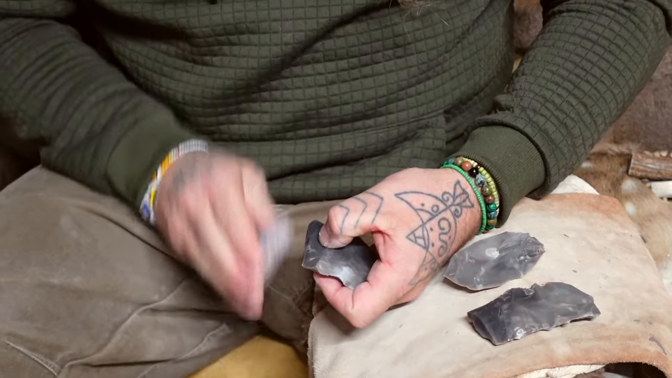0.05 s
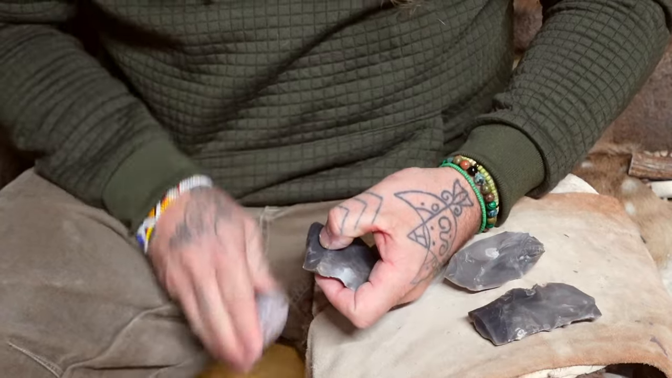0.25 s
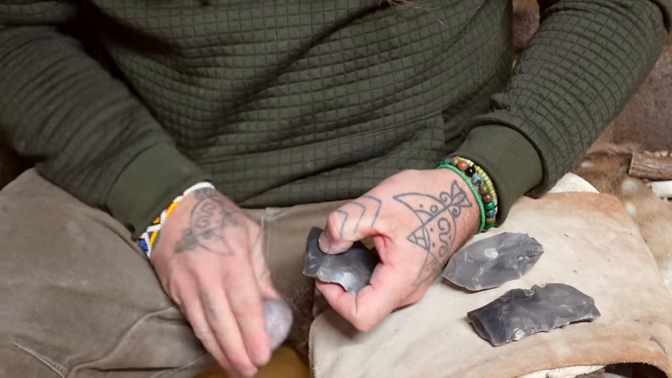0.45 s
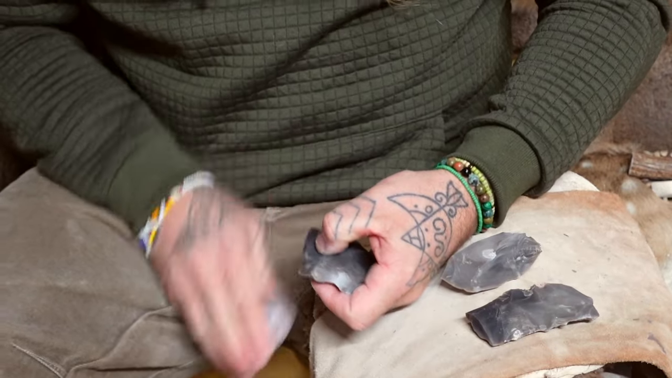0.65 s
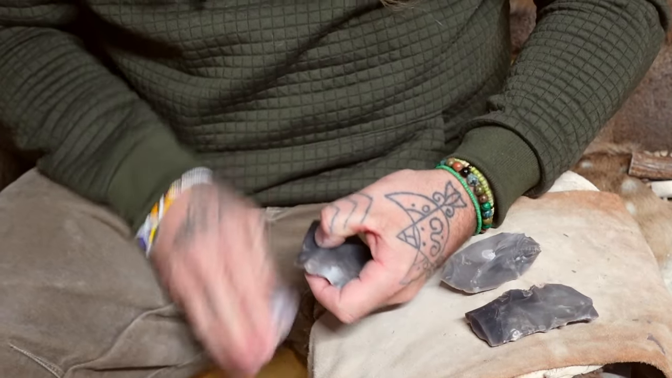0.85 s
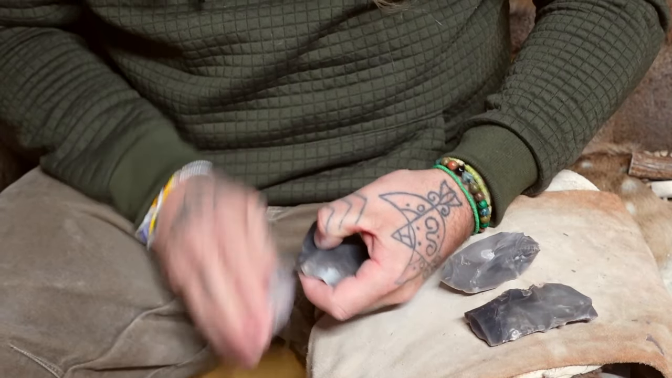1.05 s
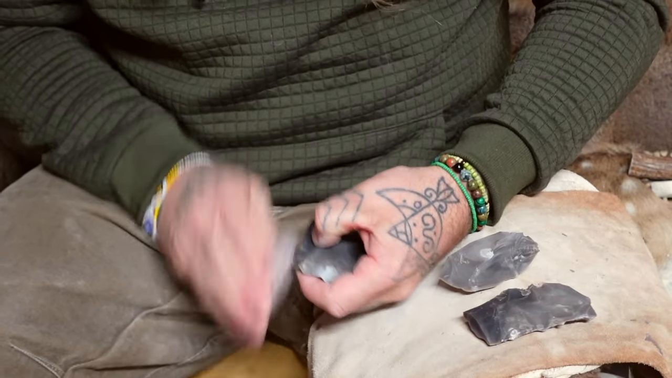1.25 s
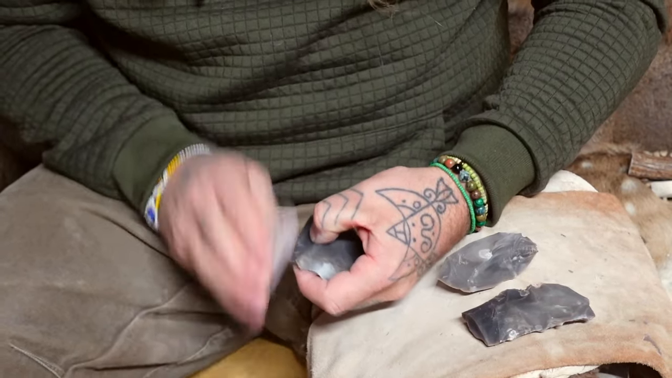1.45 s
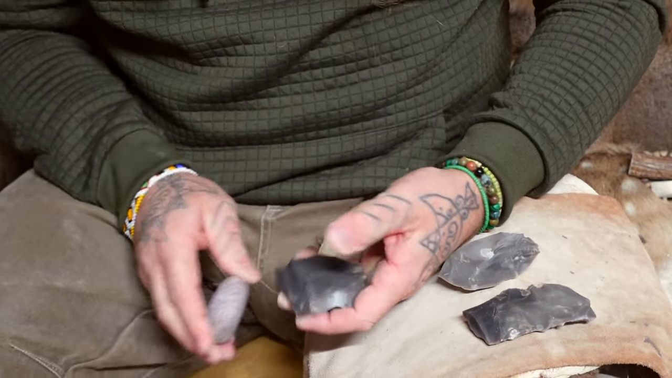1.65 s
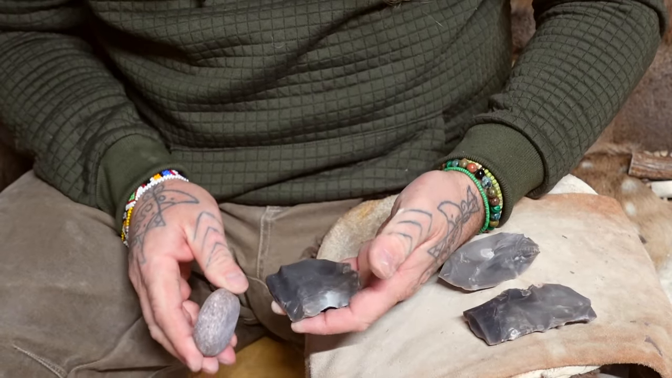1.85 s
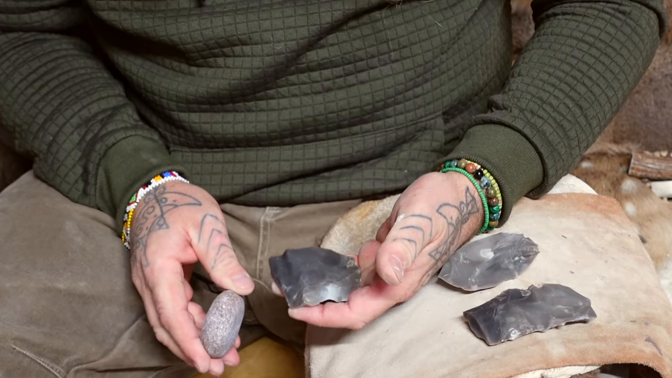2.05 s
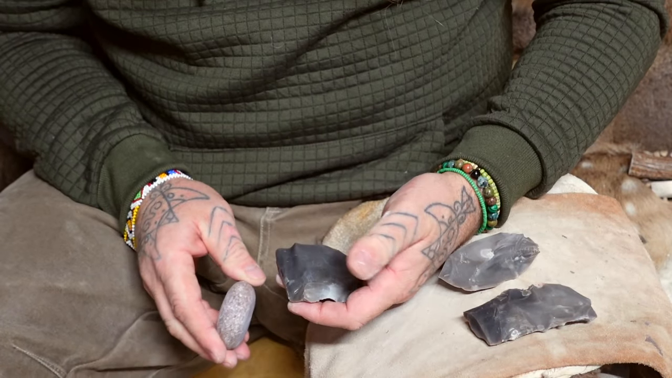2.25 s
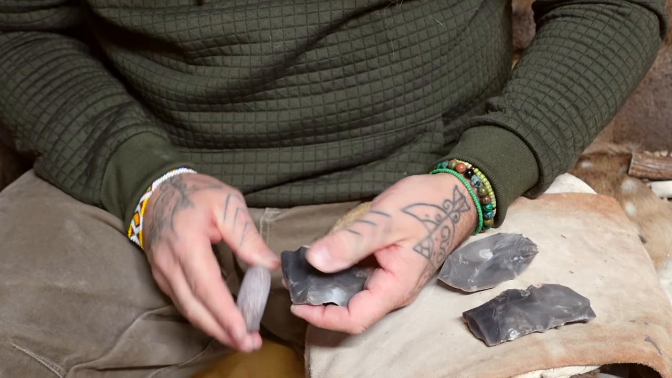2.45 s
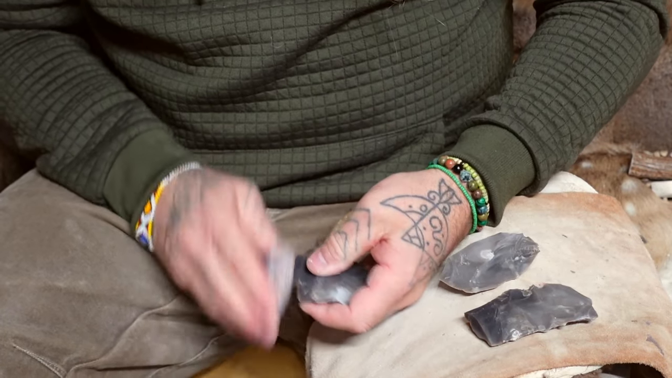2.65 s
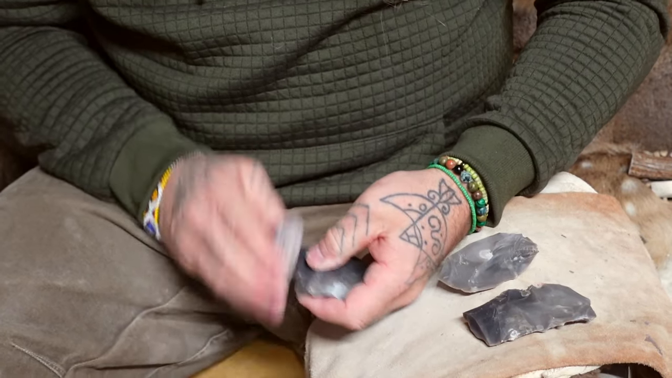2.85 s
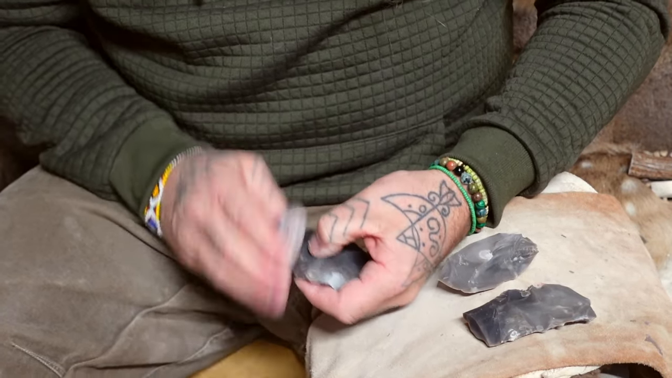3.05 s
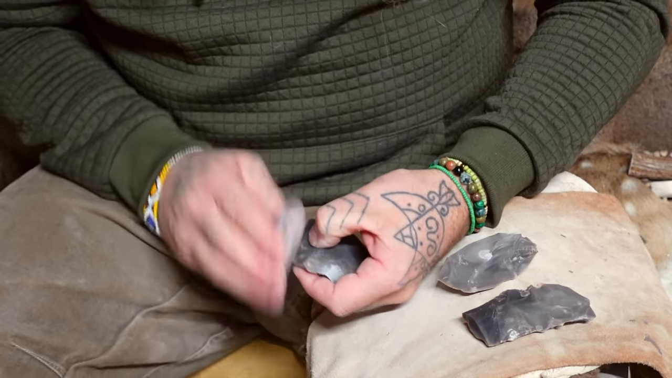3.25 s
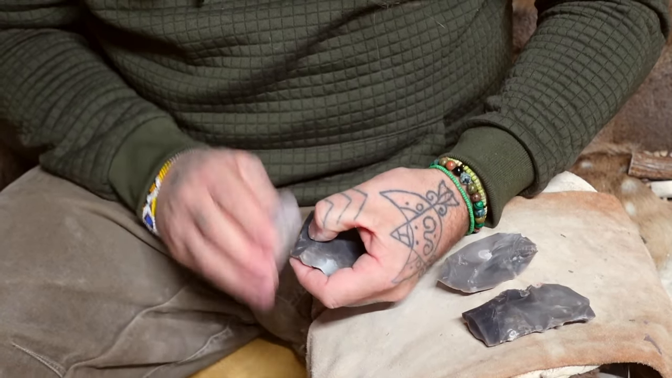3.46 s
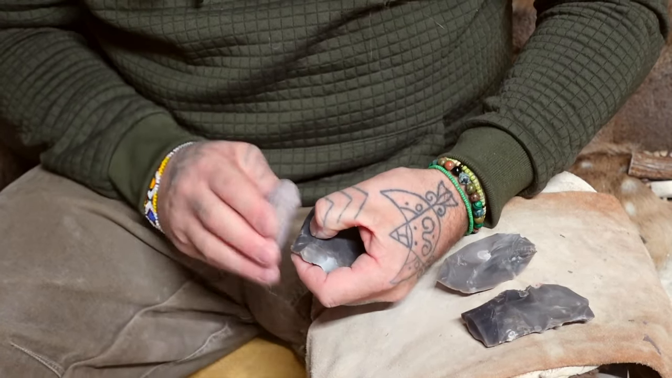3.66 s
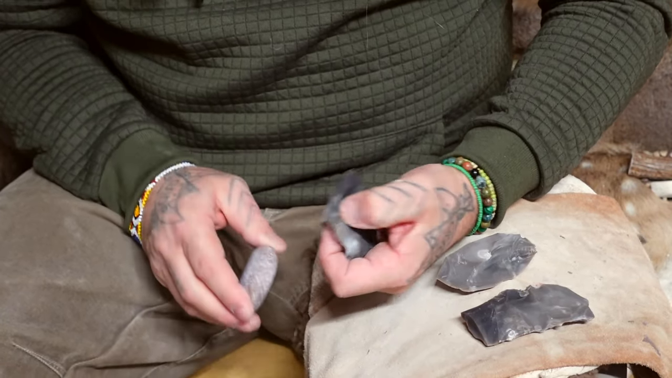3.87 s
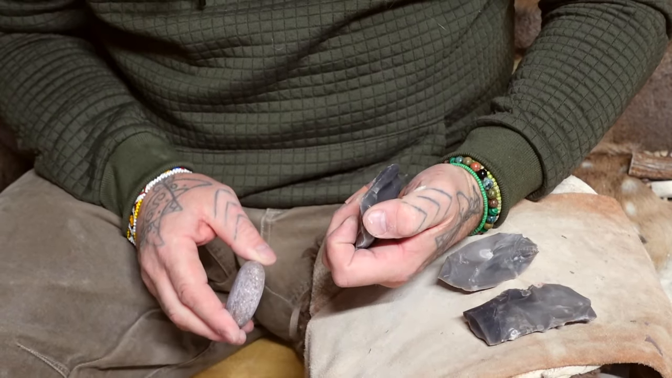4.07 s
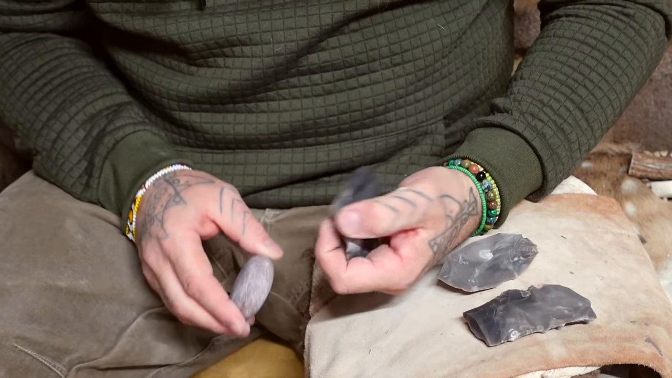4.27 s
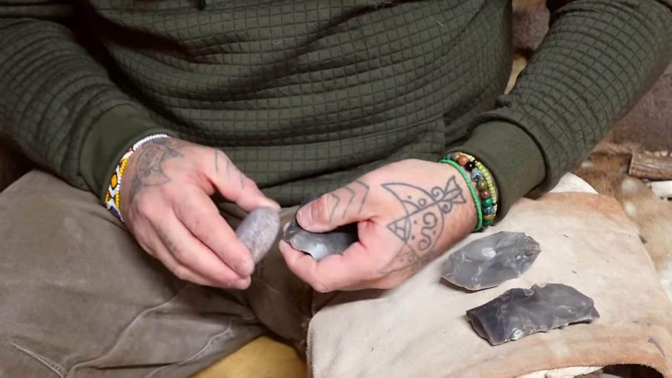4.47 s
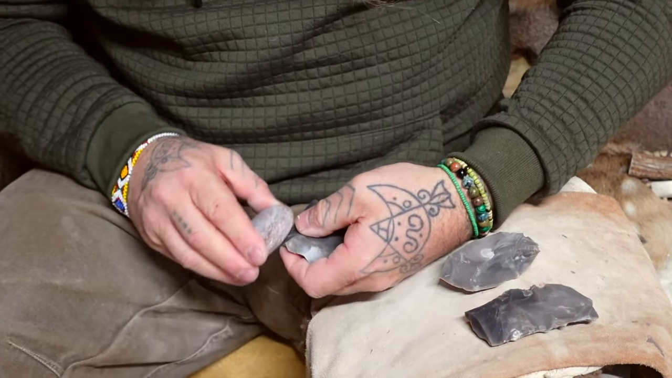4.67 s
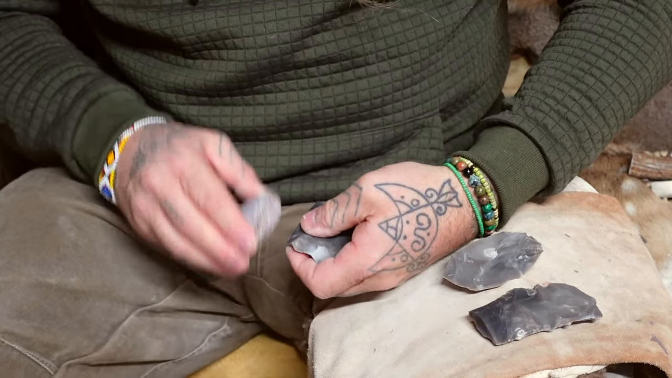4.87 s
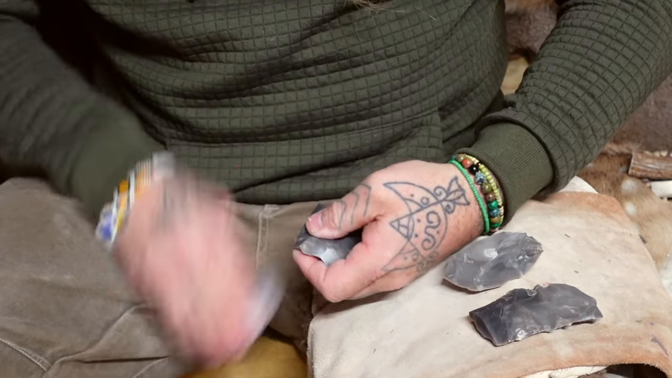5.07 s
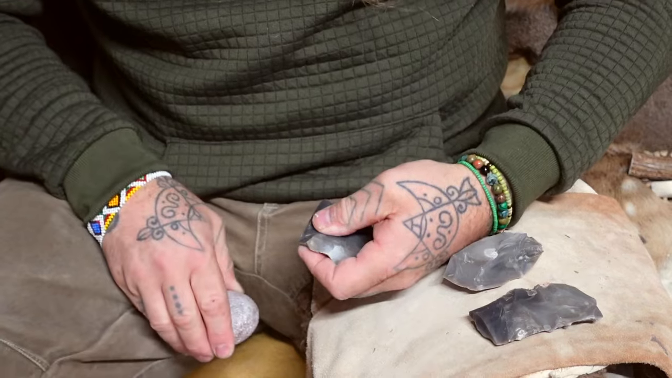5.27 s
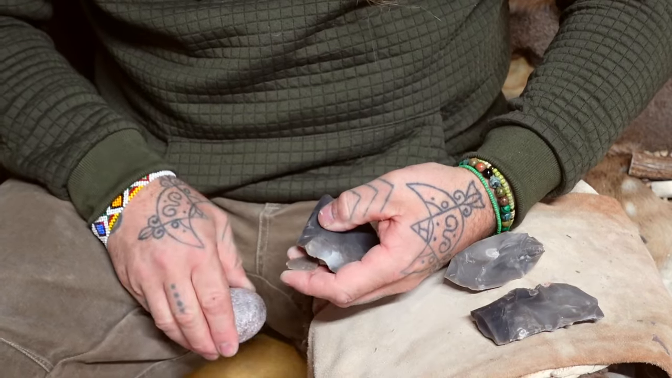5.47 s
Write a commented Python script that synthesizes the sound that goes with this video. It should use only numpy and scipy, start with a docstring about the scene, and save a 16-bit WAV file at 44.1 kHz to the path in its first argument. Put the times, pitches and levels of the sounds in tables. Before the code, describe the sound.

Flint knapping heard close and nearly central over faint hiss. Eight brisk dry clacks, varying from dull and glancing to hard and bright, then a pause with small tinkling debris. Seven more blows follow, starting softly. A flake drops with a glassy ring, the stone touches lightly, and a final strike crunches off another flake. Short room reverberation.

```python
"""In a small room, close to the microphone: flint knapping, in two runs of blows and one last blow.
A hammerstone clacks on a hand-held chert core (damped resonances) and skids off it (random slips).
The last blow splits off a flake with a noisy crackle; light touches and knocks fall between blows.
Chips and flakes land with a noise tick and ring as decaying sines, crumbs only tick, over filtered hiss.
A short room tail follows each blow, and the limiter flattens the hardest ones, so their tails stand out."""
import sys
import numpy as np
from scipy import signal
from scipy.fft import rfft, irfft, next_fast_len
from scipy.io import wavfile
from scipy.ndimage import uniform_filter1d, minimum_filter1d

SR = 44100
rng = np.random.default_rng(int(sys.argv[2]) if len(sys.argv) > 2 else 0)


def persist_wave(psi):
    """Save psi, clipped to +-1, as 16-bit WAV."""
    counts = np.round(np.clip(psi, -1, 1) * 32767).astype(np.int16)
    wavfile.write(sys.argv[1], SR, np.atleast_2d(counts).T)


N = 243431
T = np.arange(SR // 2) / SR  # the half second given to each event (s)
HZ = np.fft.rfftfreq(len(T), 1 / SR)
LEAD = .0005  # rise of a contact (s)
MAIN_HZ = 3100  # main ring that the stone resonances are tuned to


def amp(db):
    """Decibels to gain."""
    return 10 ** (np.asarray(db) / 20)


def unit(x):
    """x at rms 1."""
    return x / np.sqrt(np.mean(x ** 2) + 1e-20)


def along(points, hz):
    """Interpolate (Hz, value) points on a log frequency axis."""
    f, v = np.transpose(points)
    return np.interp(np.log(hz + 1), np.log(f), v)


def coloured(x, points):
    """Filter x through a (Hz, dB) curve."""
    size = x.shape[-1]
    padded = next_fast_len(size + 8192)
    gain = amp(along(points, np.fft.rfftfreq(padded, 1 / SR)))
    return irfft(rfft(x, padded) * gain, padded)[..., :size]


def add(out, s, sound):
    """Mix a stereo sound into out at time s."""
    start = round(s * SR)
    a, b = max(start, 0), min(start + sound.shape[1], N)
    out[:, a:b] += sound[:, a - start:b - start]


# How long the room rings. Each row: frequency in Hz, t60 in seconds.
ROOM = [(200, 0.58), (1000, 0.47), (3000, 0.34), (6000, 0.31), (12000, 0.37)]
# Tone of the room tail. Each row: frequency in Hz, relative level in dB.
ROOM_COLOUR = [(100, 5.5), (1000, -0.5), (3000, 0), (7000, 4), (14000, 3)]


def in_room(x, wet_db, radiated=None, side_db=-13, build=0.00093):
    """A close sound plus the diffuse tail of what it radiates all round, nearly alike in both ears."""
    radiated = x if radiated is None else radiated
    # noise that dies at its own rate in each band
    hz, t, bands = signal.stft(rng.standard_normal((2, len(T))), SR, nperseg=256)
    decay = amp(-60 * t / along(ROOM, hz)[:, None])
    tails = signal.istft(bands * decay, SR, nperseg=256)[1][:, :len(T)]
    tails = tails * (1 - np.exp(-T / build))
    tails = coloured(tails / np.linalg.norm(tails[0]), ROOM_COLOUR)
    mid, side = amp(wet_db) * signal.fftconvolve(radiated[None], tails, axes=1)[:, :len(T)]
    return x + mid + amp(side_db) * np.array([side, -side])


def ring(modes, split_hz=28):
    """Decaying (Hz, dB, t60) modes; an uneven shape splits each into a beating pair."""
    x = 0
    for (hz, db, t60), split in zip(modes, rng.normal(0, split_hz, len(modes))):
        pair = np.sin(2 * np.pi * hz * T) + .5 * np.sin(2 * np.pi * (hz + 2 * split) * T)
        x = x + amp(db - 1.5 - 60 * T / t60) * pair
    return x


# Tone of a hard edge touching. Each row: frequency in Hz, relative level in dB.
CRACK = [(150, -36.5), (1000, -17), (4000, -4), (9000, 1), (15000, -6)]


def tick(t60, colour=CRACK):
    """The crack of one hard contact: a decaying noise burst, peak 1."""
    burst = rng.standard_normal(len(T)) * amp(-60 * T / t60) * (T > LEAD)
    x = coloured(burst, colour)
    return x / np.abs(x).max()


# Resonances of stone and core, damped by the hands, before retuning and varying for each contact.
# Each row: frequency in Hz, width in Hz, relative level in dB.
STONE = [(397, 530, -49.5), (1090, 250, -24), (2054, 218, -4), (2637, 195, -3), (3080, 292, 0),
         (4053, 260, -9), (5490, 790, -9.5), (7170, 1500, -32)]
# Tone of a stone contact. Each row: frequency in Hz, relative level in dB.
CONTACT = [(50, -29), (160, -8), (300, 2), (900, 3), (4500, 12), (7000, -6.5), (10000, -12.5), (15000, -32)]


def stone_ring(main_hz, brightness, damping, reflected, vary_db=2.5):
    """The stones' answer to one contact, of energy 1; grip and striking point shift the modes."""
    response = 0
    for (hz, width, db), gain in zip(STONE, rng.standard_normal(len(STONE))):
        hz, width = hz * main_hz / MAIN_HZ, width * damping
        db = db + vary_db * gain + brightness * np.log2(hz / main_hz)
        response = response + amp(db) * 1j * HZ * width / (hz ** 2 - HZ ** 2 + 1j * HZ * width)
    # near reflections off the hands and lap follow within about two milliseconds
    lags = rng.uniform(0.00024, 0.002028, size=3)
    reflections = 1 + reflected * sum(np.exp(-2j * np.pi * HZ * lag) for lag in lags)
    delay = np.exp(-2j * np.pi * HZ * LEAD)
    x = irfft(response * reflections * amp(along(CONTACT, HZ)) * delay, len(T)) * (T < .1)
    return x / np.linalg.norm(x)


def skid(length, body, rate, spread_db, start_grip=0.47):
    """Uneven slips, rate per second, bite harder until the stone leaves the edge; each sounds the body."""
    pressure = np.interp(T / length, [0, .6], [start_grip, 1])
    pressure = pressure * np.clip((length - T) * SR, 0, 1) * (T > 2 * LEAD)
    sizes = amp(spread_db * rng.standard_normal(len(T))) * rng.choice([-1, 1], len(T))
    slips = (rng.random(len(T)) < rate / SR) * sizes
    x = signal.fftconvolve(slips * pressure, body)[:len(T)]
    return unit(x) * np.sqrt(length / T[-1])  # about rms 1 over the skid's length


# Tone of the background hiss. Each row: frequency in Hz, relative level in dB per Hz.
AIR = [(25, -32.5), (60, -14), (110, -4), (200, -0.5), (400, -2.5), (850, -2.5), (1700, 1), (3000, -4),
       (6000, -12), (15000, -17.5)]
AIR_DB = -62
DRAUGHT_DB, DRAUGHT_END_S, DRAUGHT_FADE_DB_PER_S = -40.5, .25, 1500


def air():
    """Quiet hiss as filtered noise, and a brief low draught mainly on the left microphone port."""
    mid, side = unit(coloured(rng.standard_normal((2, N)), AIR))
    side = coloured(side, [(60, -4.5), (250, -3.5), (1000, -3.5), (8000, -18)])
    hiss = amp(AIR_DB) * np.array([mid + side, mid - side])
    rumble_colour = [(10, 8), (20, 11), (33, 0.0), (70, -19), (200, -49.5), (1000, -100)]  # (Hz, dB)
    draught = unit(coloured(rng.standard_normal(N), rumble_colour))
    fading = np.maximum(np.arange(N) / SR - DRAUGHT_END_S, 0)
    draught = draught * amp(DRAUGHT_DB - DRAUGHT_FADE_DB_PER_S * fading)
    return hiss + draught * amp([[0], [-28]])


CRUMB_DB, CRUMB_SPREAD_DB = -47.5, 5.5
CRUMB_FIRST_S, CRUMB_LAST_S = 0.058, 0.25  # earliest and latest landing after a blow


def crumbs(count=2):
    """Every blow sheds a few crumbs too small to ring: dry noise ticks."""
    out = np.zeros((2, N))
    for s, *_ in BLOWS:
        falls = rng.uniform(CRUMB_FIRST_S, CRUMB_LAST_S, count)
        levels = rng.normal(CRUMB_DB, CRUMB_SPREAD_DB, count)
        for fall, size_db in zip(falls, levels):
            add(out, s + fall, np.tile(amp(size_db) * tick(0.00763), (2, 1)))
    return out


# Small chips landing. Each row: start in seconds, level in dB, ring in Hz.
CHIPS = [(0.4216, -30.5, 5502), (.719, -44, 8100), (.806, -47, 10700), (.843, -28.5, 12150),
         (1.153, -41.5, 11500), (1.363, -29, 11700), (1.546, -28, 11822), (1.681, -35, 10570),
         (1.73, -46.5, 6730), (1.8024, -41, 9620), (1.847, -46, 9980), (1.905, -44.5, 4780),
         (1.971, -43.5, 5620), (3.171, -33.5, 10590), (3.274, -49, 14034), (3.917, -40, 11730),
         (4.0709, -43, 8540)]
# Modes of a chip. Each row: multiple of the ring frequency, relative level in dB, t60 in seconds.
CHIP_MODES = [(0.619, -15.5, .04), (0.999, 2.5, .055), (1.899, -4.5, .05)]
CHIP_TICK_DB = 5.5  # landing tick relative to the chip's level


def chips():
    """Small chips tick as they land and ring high like glass."""
    out = np.zeros((2, N))
    rise = 1 - np.exp(-T / LEAD)
    for s, db, hz in CHIPS:
        modes = [(hz * k, level, t60) for k, level, t60 in CHIP_MODES if hz * k < SR / 2]
        chip = rise * ring(modes) + amp(CHIP_TICK_DB) * tick(0.0079)
        add(out, s, in_room(amp(db) * chip, wet_db=-10.5))
    return out


# Ring of three thin flakes. Each row: frequency in Hz, relative level in dB, t60 in seconds.
BLADE = [(8258, -2, .09), (9857, 0, .05), (10970, -4, .06), (12000, -5, .12), (13070, -12, .07),
         (14110, -18, .07)]
SHARD = [(4120, -23, .07), (8165, 0, .085), (11870, -11, .08), (13470, -5, .09)]
SLIVER = [(4160, -8, 0.079), (9087, 4, 0.077), (10980, 6.5, 0.066), (12900, -2, 0.14)]
# Flakes dropping and bouncing. Each row: start in seconds, ring level in dB, modes of the flake.
DROPS = [(4.391, -19.5, BLADE), (4.4, -23.5, BLADE), (4.4896, -42.5, BLADE), (4.507, -49, BLADE),
         (4.5237, -37, BLADE), (4.567, -49, BLADE), (5.2571, -12, SHARD), (5.382, -70, SHARD),
         (5.43, -39, SLIVER), (5.4958, -55, SLIVER)]
DROP_TICK_DB, DROP_TICK_GROWS = -12, .55  # tick of a 0 dB landing; dB of tick per dB of ring


def flakes():
    """Larger flakes drop and bounce, each landing a tick and a glassy ring."""
    out = np.zeros((2, N))
    rise = 1 - np.exp(-T / LEAD)
    for s, db, modes in DROPS:
        # each landing excites the modes in new proportions
        struck = [(hz, level + rng.normal(0, 1.3), t60) for hz, level, t60 in modes]
        add(out, s, in_room(amp(db) * rise * ring(struck), wet_db=-17.5))
        landing = amp(DROP_TICK_DB + DROP_TICK_GROWS * db) * tick(0.031)
        add(out, s, in_room(landing, wet_db=-7.5))
    return out


# Dull knocks of the stone in the hand. Each row: start in seconds, level in dB, ring in Hz.
KNOCKS = [(.339, -18.5, 1500), (4.392, -38, 1490), (4.602, -42, 1790), (5.14, -38, 362),
          (5.1481, -24, 1007)]
KNOCK_CYCLES = 16.2  # cycles until a knock's main mode has died by 60 dB


def knocks():
    """Softer contacts ring low and die at once: two short modes and a noise thud."""
    out = np.zeros((2, N))
    for s, db, hz in KNOCKS:
        t60 = KNOCK_CYCLES / hz
        thud = tick(t60, [(hz / 4, -24), (hz, 0), (hz * 2, -4), (hz * 8, -28)])
        knock = ring([(hz, 0, t60), (hz * 2, -6, t60 / 2)]) * (1 - np.exp(-T / LEAD))
        add(out, s, in_room(amp(db) * (knock + amp(1.5) * thud), wet_db=-9.0))
    return out


# The stone set lightly against the edge to take aim. Each row: start in seconds, level in dB.
TOUCHES = [(4.714, -19.5), (4.743, -24), (4.7525, -21), (4.761, -29)]


def touches(scrape_db=-33):
    """Light contacts sound the same stones dully and scrape a little."""
    out = np.zeros((2, N))
    for s, db in TOUCHES:
        body = stone_ring(MAIN_HZ, brightness=-12, damping=1.0, reflected=0.38)
        scrape = amp(scrape_db) * skid(0.011, body, rate=1500, spread_db=15)
        add(out, s - LEAD, in_room(amp(db) * (body + scrape), wet_db=-10.0))
    return out


# Tone of the splitting chert. Each row: frequency in Hz, relative level in dB.
SPLIT_COLOUR = [(80, -39), (300, -13), (1000, -20.5), (2000, 4.5), (4500, 3), (7500, 2.5), (10000, -7),
                (15000, -17)]
SPLIT_S, SNAP_DB, SNAP_T60_S = 5.108, -17, 0.014
CRUNCH_DB, CRUNCH_ATTACK_S, CRUNCH_HOLD_S, CRUNCH_FADE_DB_PER_S = -28, 0.022, 0.019, 249


def fracture():
    """The last blow parts a flake: a dense crackle snaps, then swells, holds and dies as it slides off."""
    out = np.zeros((2, N))
    snap = amp(SNAP_DB - 60 * T / SNAP_T60_S)
    fading = np.maximum(T - CRUNCH_ATTACK_S - CRUNCH_HOLD_S, 0)
    slide = np.minimum(T / CRUNCH_ATTACK_S, 1) * amp(CRUNCH_DB - CRUNCH_FADE_DB_PER_S * fading)
    # noise of widely varying strength sounds grainy
    crackle = rng.standard_normal(len(T)) * amp(2.7 * rng.standard_normal(len(T)))
    split = unit(coloured(crackle, SPLIT_COLOUR)) * (snap + slide)
    add(out, SPLIT_S, in_room(split, wet_db=-6.5))
    return out


# Tone of crushed grains. Each row: frequency in Hz, relative level in dB.
GRIT = [(60, -47), (250, -15.5), (700, -14), (1100, -5.5), (2200, 3), (4000, -2), (7500, -3), (10000, -6.5),
        (15000, -11.5)]
# Hammerstone on the edge. Each row: start in seconds, hit level in dB before the clack gain, main ring
# in Hz, brightness in dB per octave (low is glancing, high is square), skid length in seconds, grit in dB.
BLOWS = [ (-.03, 6, 2880, -5.5, 0.028, -36.5), (.199, 5, 3020, -9.5, .016, -38),
         (0.4436, -2, 2874, -11, 0.01, -29.5), (0.6614, -5, 2430, -8, 0.013, -27.5),
         (.867, 11.5, 3230, 9.5, 0.0086, -32.5), (1.0796, 8.5, 3125, -3, 0.022, -36),
         (1.2991, 12.5, 3274, 8, 0.012, -48), (1.5104, 12.5, 3350, 9.5, 0.064, -38.5),
         (2.6851, -7.5, 3100, -2, .031, -50.5), (2.897, -4.5, 3105, -5, 0.031, -51),
         (3.0989, 5.5, 3130, -4.5, 0.026, -38.5), (3.31, 10, 3170, 6, 0.014, -45),
         (3.516, 6.5, 2950, 4, 0.022, -30.5), (3.7263, -7, 2700, 0, 0.018, -27),
         (3.7422, -4.5, 3020, 4, 0.014, -35.5), (5.1082, -10.5, 3450, 14, 0.0023, -48)]
SKID_DB, SKID_DB_PER_BRIGHT = -25, -0.44  # a glancing hit skids louder


def hammerstone(clack_db=9):
    """Each blow clacks the stones' resonances, then the stone skids off the edge and crushes grit."""
    out = np.zeros((2, N))
    for s, hit_db, main_hz, brightness, length, grit_db in BLOWS:
        body = stone_ring(main_hz, brightness, damping=1.0, reflected=0.64)
        # summed over all directions the resonances blur together
        diffuse = stone_ring(main_hz, brightness, damping=2.27, reflected=0)
        # a brighter, squarer hit also cracks the edge
        crack = amp(hit_db - 27.5 + 2 * brightness) * tick(0.0065)
        skid_body = stone_ring(main_hz, brightness, damping=0.96, reflected=0.065)
        skid_db = SKID_DB + SKID_DB_PER_BRIGHT * brightness
        chatter = amp(skid_db) * skid(length, skid_body, rate=2000, spread_db=5)
        # the grit outlasts the skid slightly
        grit = amp(grit_db) * skid(length + 0.0041, tick(0.0029, GRIT), rate=2100, spread_db=4)
        force = amp(hit_db + clack_db)
        close = force * body + crack + chatter + grit
        radiated = force * diffuse + chatter + grit
        add(out, s - LEAD, in_room(close, wet_db=-10.5, radiated=radiated))
    return out


def scene():
    """All the stone sounds sit close and almost central, over the air."""
    debris = crumbs() + chips() + flakes()
    stones = knocks() + touches() + fracture() + hammerstone()
    return air() + (debris + stones) * amp([[.15], [-.15]])


TOP_HZ = 15900  # upper band limit


def record(dry, ceiling_db=-6.5, release_db_per_s=2800):
    """A limiter ducks just ahead of each peak and lets go quickly; then the band limit."""
    over = np.maximum(20 * np.log10(np.abs(dry).max(axis=0) + 1e-9) - ceiling_db, 0)
    # the ramp makes the held peak fall at the release rate
    ramp = release_db_per_s * np.arange(N) / SR
    gain_db = minimum_filter1d(ramp - np.maximum.accumulate(over + ramp), size=24)
    limited = dry * amp(uniform_filter1d(gain_db, size=24))
    thin = coloured(limited, [(30, -6.5), (70, -8.5), (170, 0)])  # the small microphone loses deep bass
    return coloured(thin, [(TOP_HZ, 0), (TOP_HZ + 600, -100)])


dry = scene()
out = record(dry)
persist_wave(out)
```